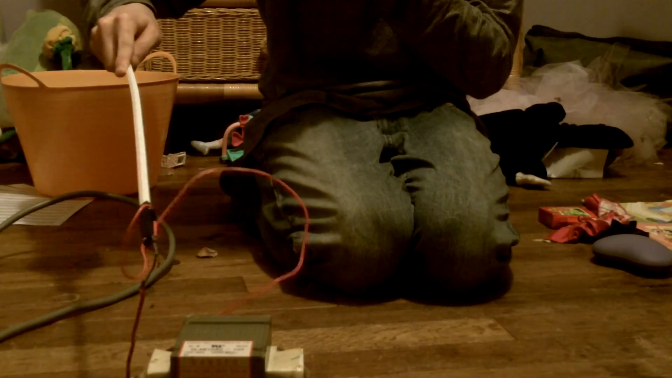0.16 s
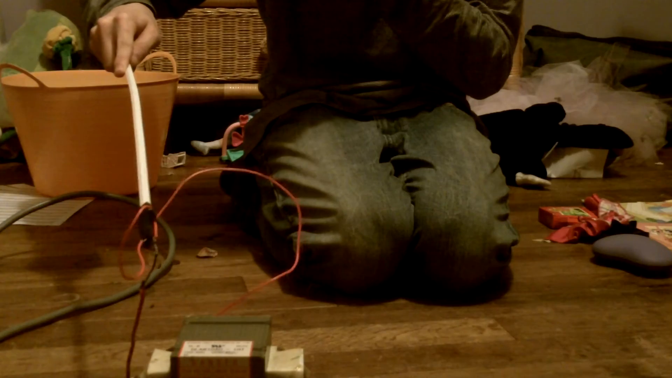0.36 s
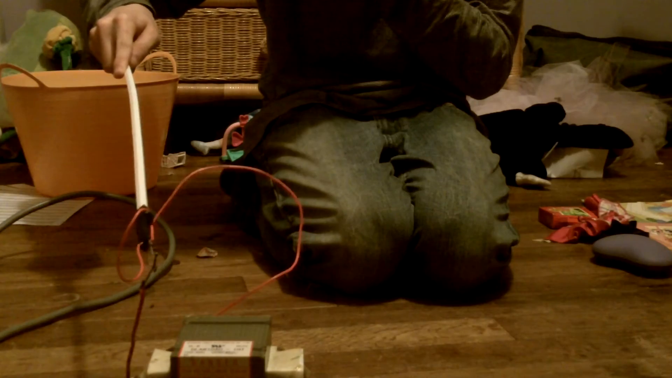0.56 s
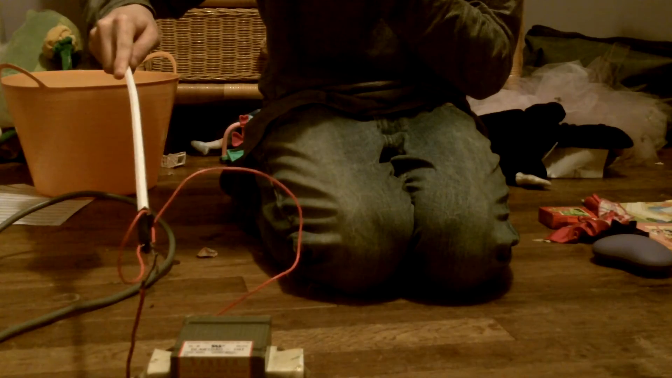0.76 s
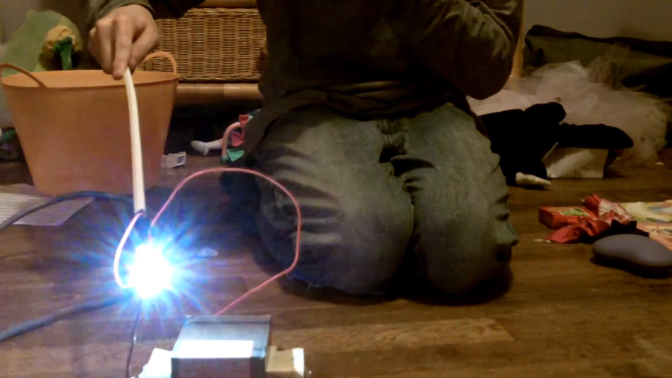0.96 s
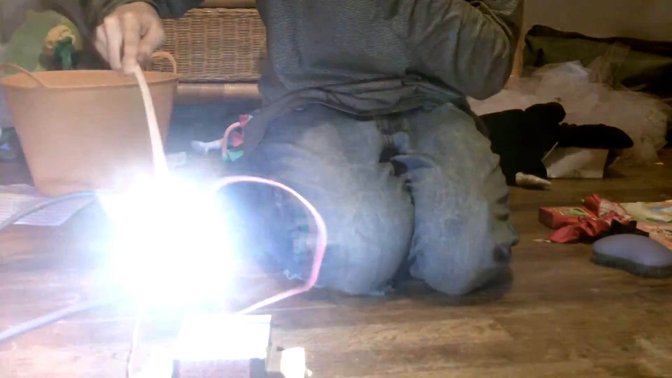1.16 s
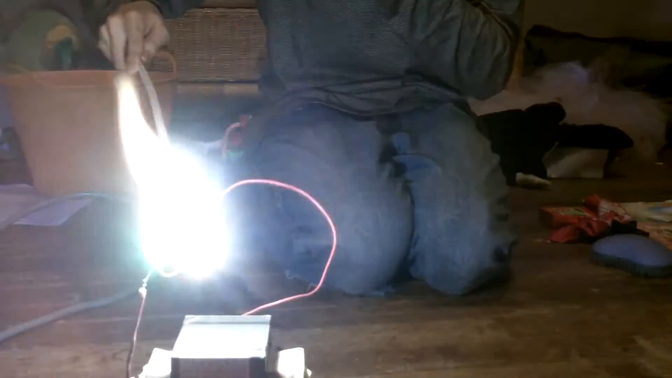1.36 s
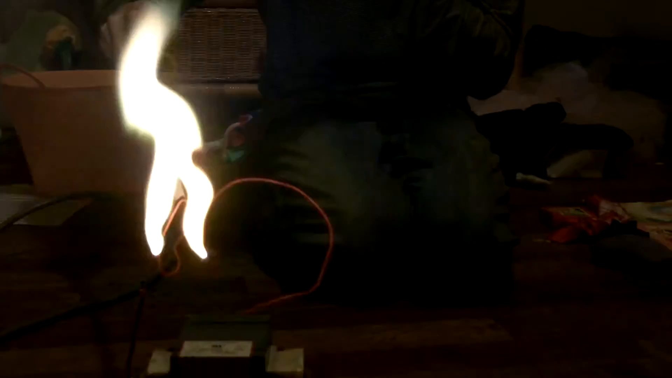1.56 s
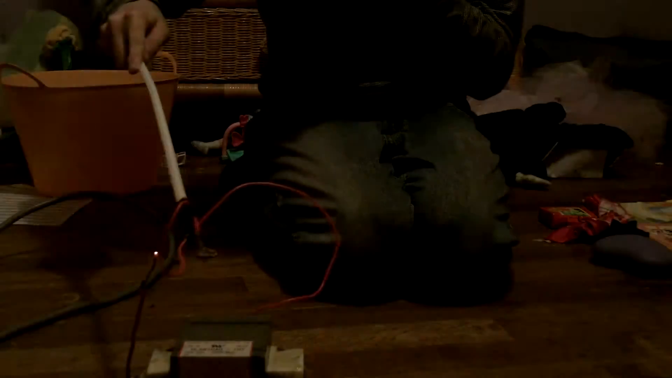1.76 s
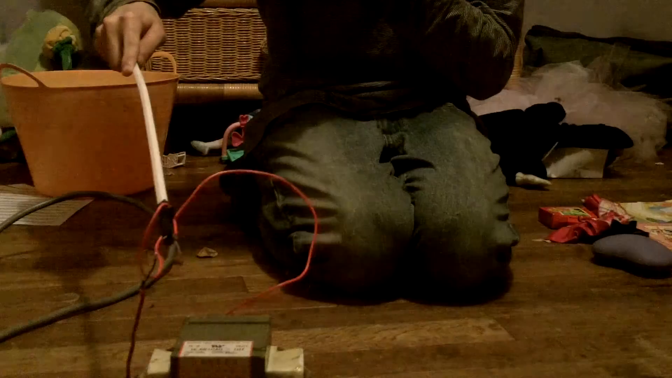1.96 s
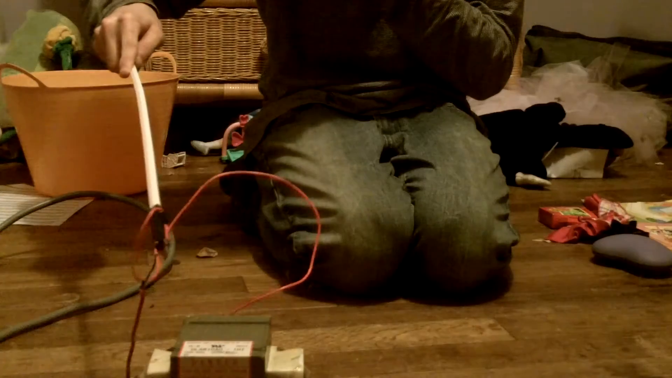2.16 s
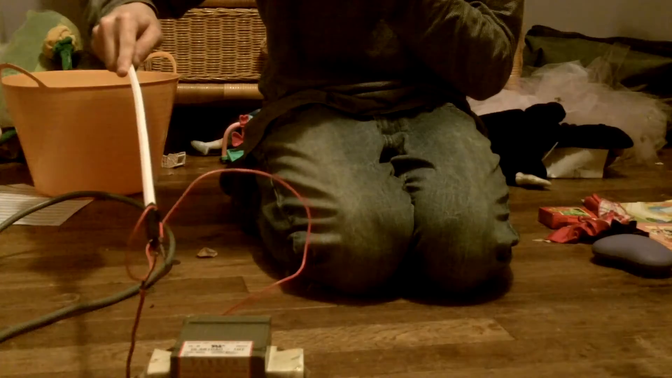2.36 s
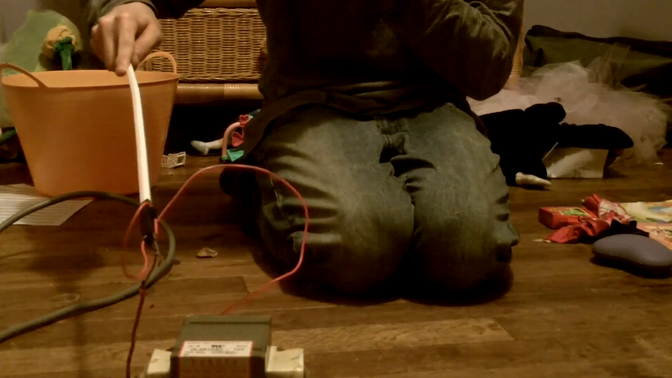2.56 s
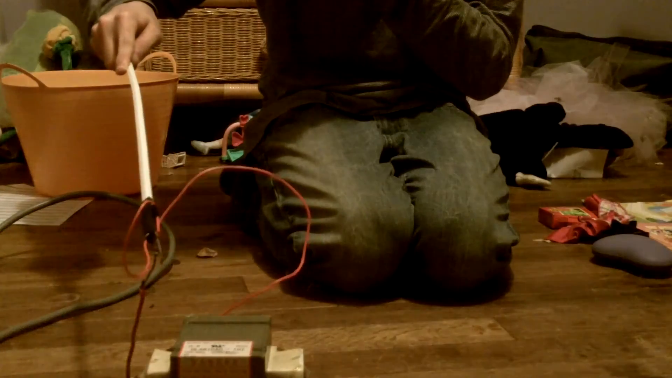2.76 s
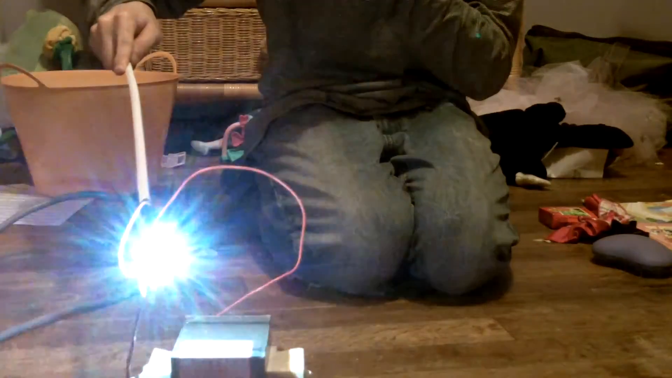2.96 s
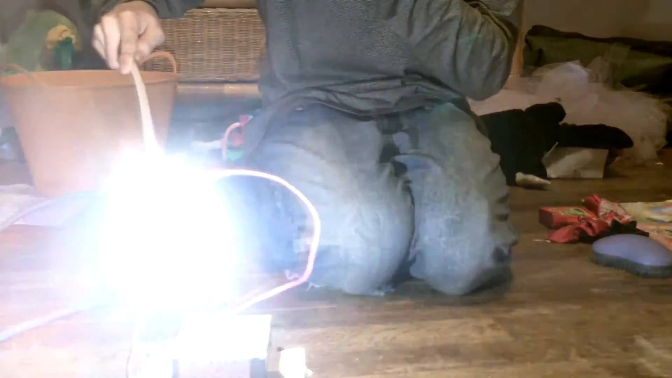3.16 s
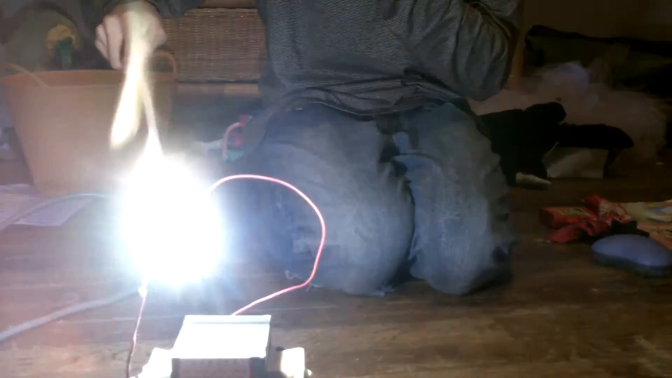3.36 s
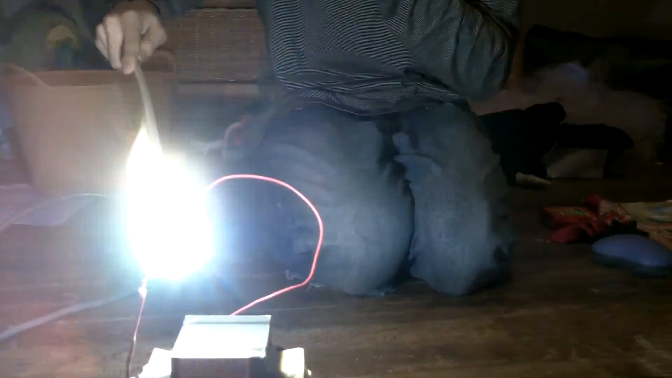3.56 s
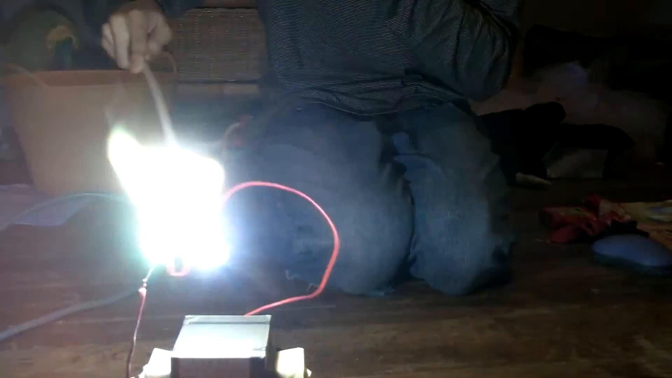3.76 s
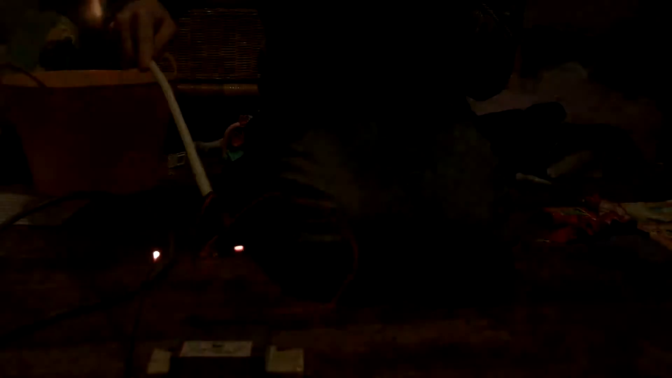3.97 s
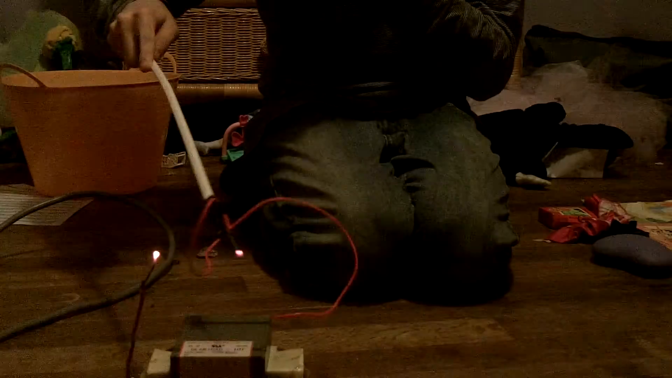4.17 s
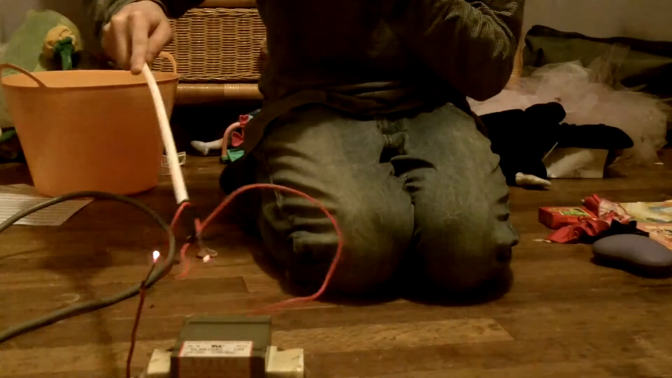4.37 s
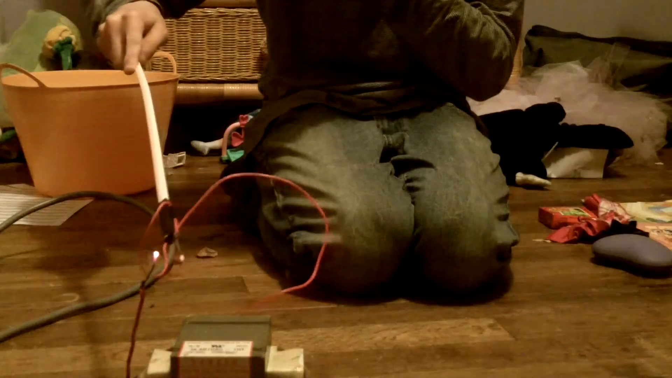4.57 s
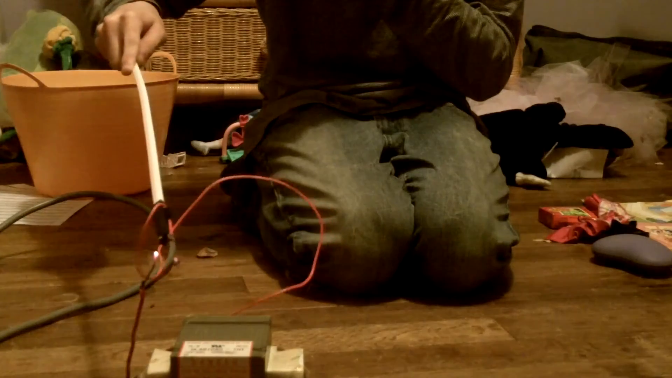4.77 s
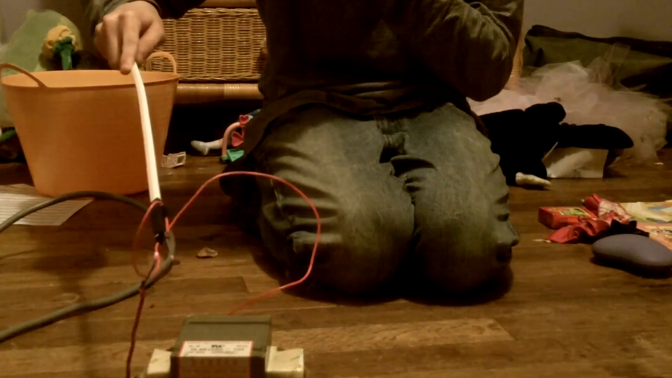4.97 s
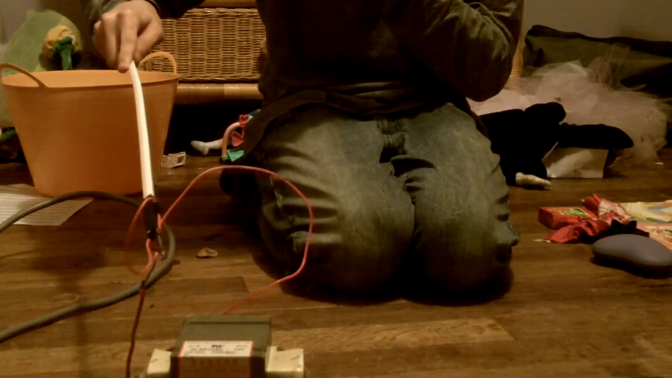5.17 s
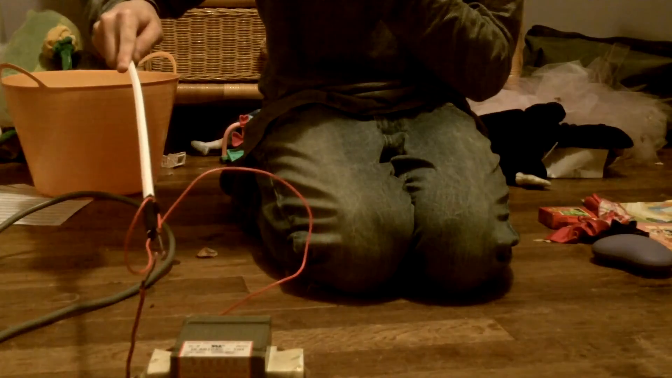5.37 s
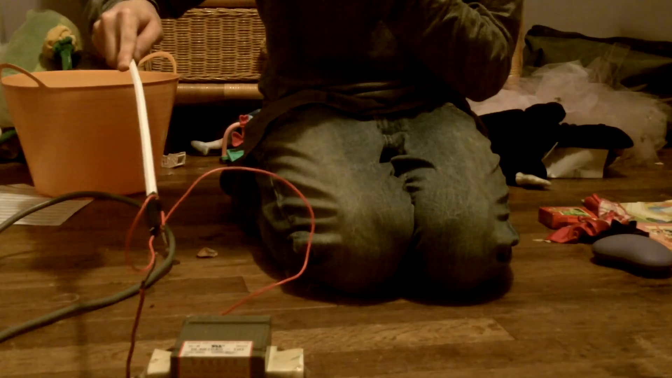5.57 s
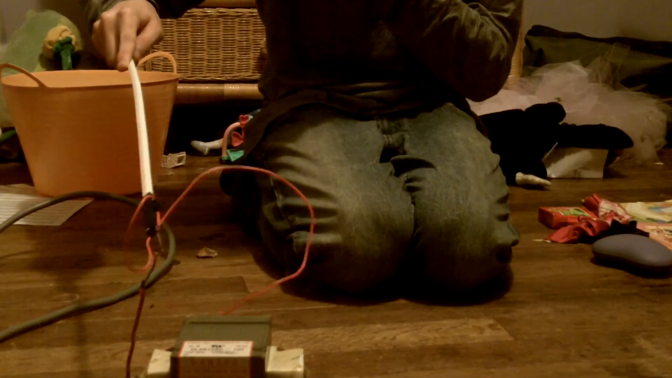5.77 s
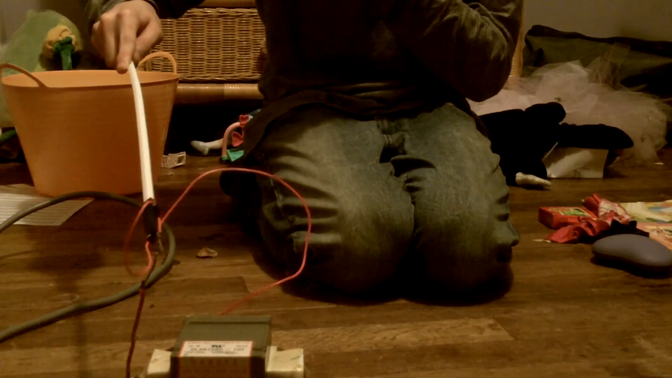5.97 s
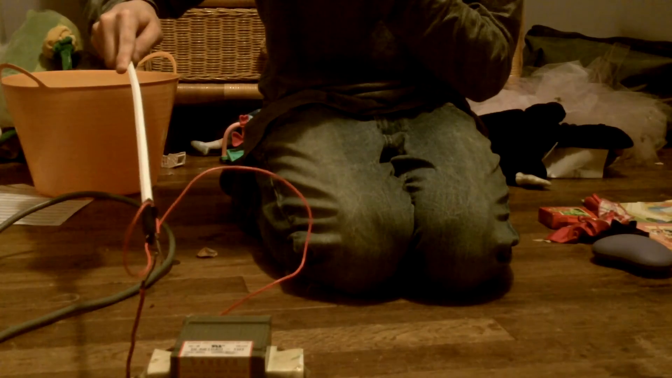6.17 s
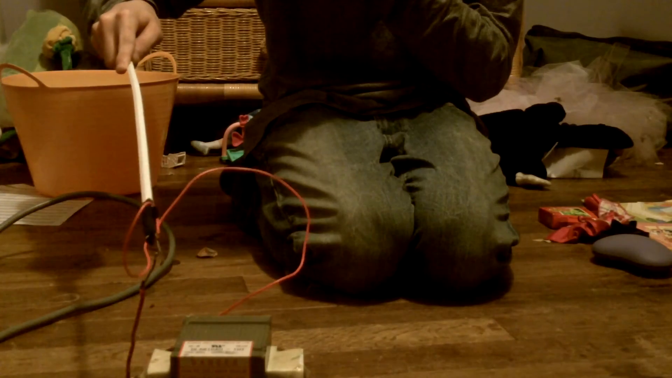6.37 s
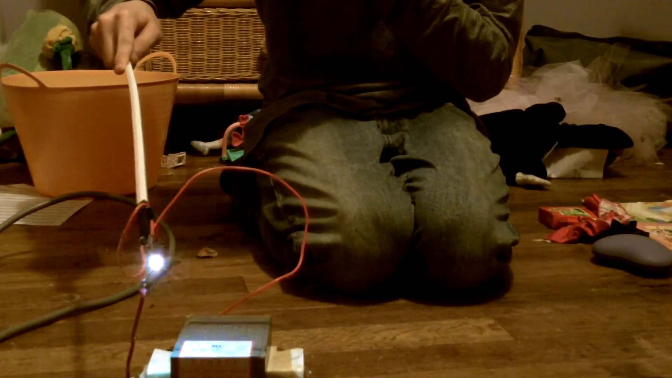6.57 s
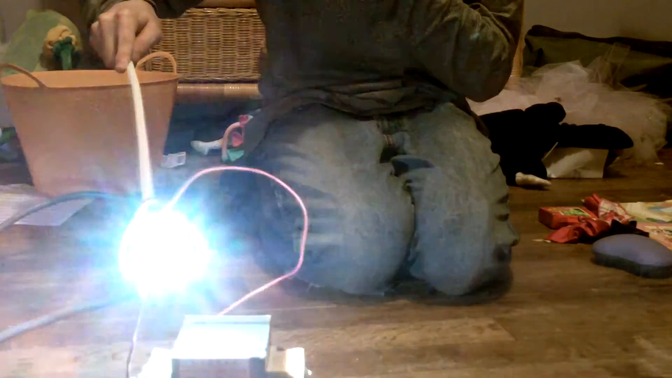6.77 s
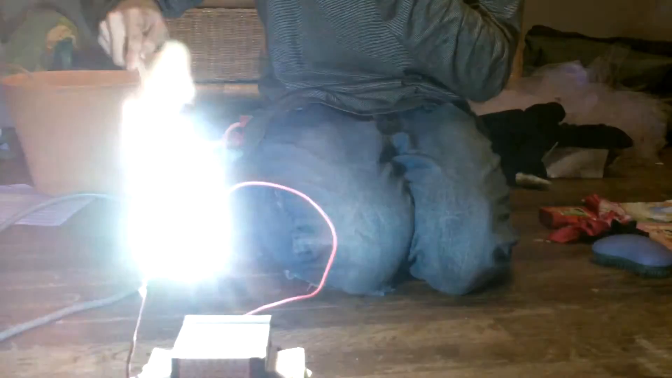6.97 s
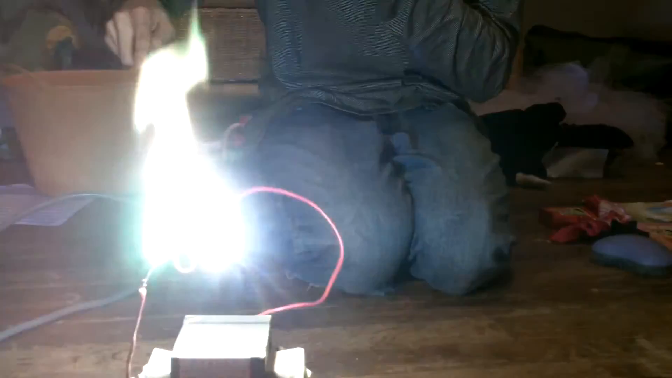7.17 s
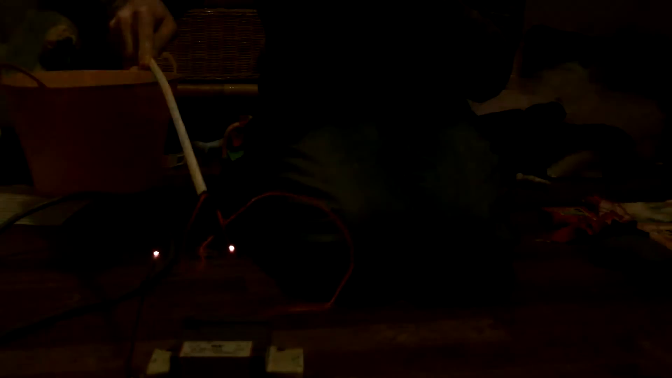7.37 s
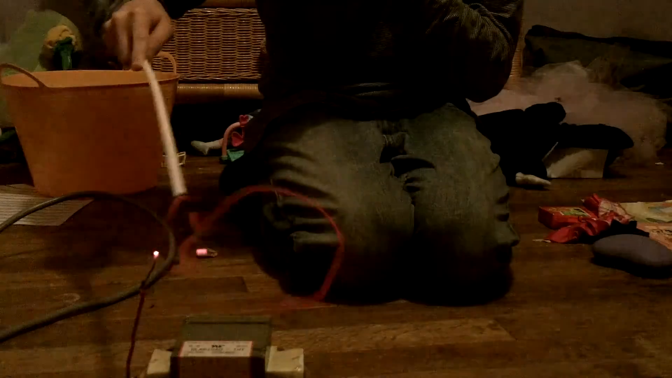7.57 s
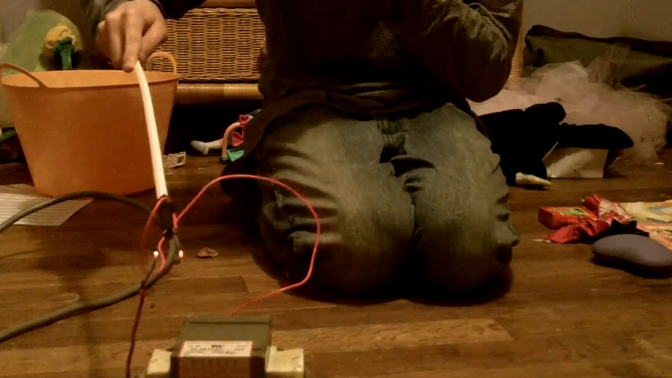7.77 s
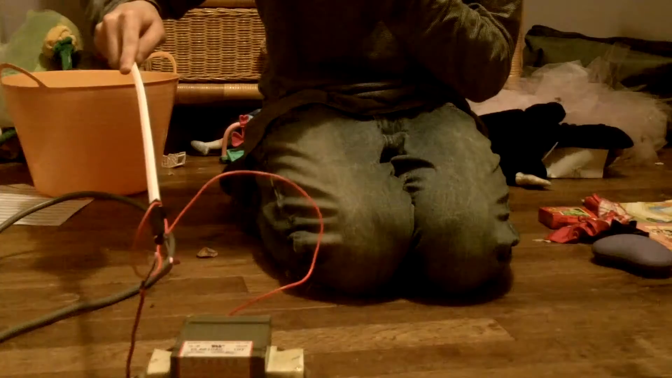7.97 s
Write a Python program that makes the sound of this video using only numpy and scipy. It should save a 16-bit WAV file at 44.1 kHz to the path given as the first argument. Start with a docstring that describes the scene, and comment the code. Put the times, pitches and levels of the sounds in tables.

```python
"""A small room with a wooden floor, where a mains transformer hums and electronics whine faintly.
The transformer strikes three arcs, each drawn out until it blows off with a soft puff.
An arc starts as a thin sizzle at the contact while the loaded core rattles. The growing flame then
throbs with every half cycle of the current, fizzes at the electrodes, crackles and snaps as it restrikes."""
import sys
import numpy as np
from scipy import signal
from scipy.fft import rfft, irfft
from scipy.io import wavfile
from scipy.ndimage import uniform_filter1d

SR = 44100
rng = np.random.default_rng(int(sys.argv[2]) if len(sys.argv) > 2 else 0)


def master(y):
    """Save y as 16-bit WAV."""
    cut = np.clip(np.atleast_2d(y).T, -1, 1)
    pcm = np.round(cut * 32767)  # scale
    wavfile.write(sys.argv[1], SR, pcm.astype(np.int16))


N = 353417
T = np.arange(N) / SR
MAINS_HZ = 60
CURRENT_ZERO = .6  # the current dies this far through each half cycle


def undb(db):
    """Decibels to gain."""
    return 10 ** (np.asarray(db) / 20)


def unit(x):
    """Scale to rms 1."""
    return x / np.sqrt(np.mean(x ** 2))


def band(x, lo_hz, hi_hz):
    """Band-pass."""
    edges_hz = [lo_hz, min(hi_hz, .48 * SR)]
    return signal.sosfilt(signal.butter(3, edges_hz, "band", fs=SR, output="sos"), x)


def ring(x, response):
    """Pass x through an impulse response."""
    return signal.fftconvolve(x, response)[:N]


def colour(x, eq, size=4096):
    """Minimum-phase EQ through points of freq_hz, gain_db."""
    hz, db = np.transpose(eq)
    bins_hz = np.arange(size // 2 + 1) * SR / size
    log_gain = np.log(undb(np.interp(np.log(bins_hz + 1), np.log(hz), db)))
    cepstrum = irfft(log_gain)
    cepstrum[1:size // 2] *= 2
    cepstrum[size // 2 + 1:] = 0
    return ring(x, irfft(np.exp(rfft(cepstrum))))


def drift(rate_hz):
    """Random modulation that glides to a new value rate_hz times a second."""
    return np.interp(T * rate_hz, np.arange(N), rng.standard_normal(N))


def delay(x, s):
    """The same sound s seconds later."""
    return np.interp(T - s, T, x, left=0)


def clicks(times_s, sizes):
    """Single impulses."""
    out = np.zeros(N)
    np.add.at(out, np.clip(np.round(times_s * SR).astype(int), 0, N - 1), sizes)
    return out


def sine(pitch_hz, rms_db, phase_cycles=0):
    """A pure tone."""
    return np.sqrt(2) * undb(rms_db) * np.sin(2 * np.pi * (pitch_hz * T + phase_cycles))


def gate(on_s, off_s, release_s=.004):
    """Instant attack, hold, quick release."""
    return (T >= on_s) * np.exp(-np.maximum(T - off_s, 0) / release_s)


# EQ of the room's noise bed: freq_hz, gain_db
ROOM_TONE_EQ = [(12, -8), (24, 1), (42, -1), (65, 0.5), (100, -5.5), (250, -10.5), (550, -14.5),
                (1200, -19.5), (3000, -22), (5200, -33), (7000, -35.5), (8200, -41.5), (10500, -34.5),
                (15500, -35)]

def room_tone(level_db=-63.5):
    """Low room rumble with microphone hiss."""
    return undb(level_db) * unit(colour(rng.standard_normal(N), ROOM_TONE_EQ, size=16384))


def electronics_whine(pitch_hz=4724, tone_db=-77, hiss_db=-79):
    """Electronics hold one thin tone in a narrow band of hiss."""
    return sine(pitch_hz, tone_db) + undb(hiss_db) * unit(band(rng.standard_normal(N), 4510, 4900))


# idle hum of the core: mains_harmonic, level_db
IDLE_PARTIALS = [(2, -76), (4, -67.5), (6, -71.5), (8, -76.5), (10, -83.5), (14, -85)]
# extra hum under load: mains_harmonic, level_db
LOAD_PARTIALS = [(2, -60), (3, -66)]

def core_hum(load, wobble_db=.7):
    """The laminations hum all the time, with more low end under load."""
    idle = sum(sine(k * MAINS_HZ, db + wobble_db * drift(5.6), rng.random()) for k, db in IDLE_PARTIALS)
    return idle + load * sum(sine(k * MAINS_HZ, db) for k, db in LOAD_PARTIALS)


# cue sheet, one row an arc; each layer and the mix trim these levels further:
# strike_s, contact_opens_s, blow_off_s, sizzle_db, sizzle_start_offset_db, crackle_db, fizz_db
ARC_CUES = [(0.886, 1.11, 1.603, -48, -9, -44.5, -64), (2.886, 3.11, 3.881, -44.5, -10, -44.5, -63.5),
            (6.636, 6.86, 7.296, -46, -2, -46, -64.5)]
# buzz fader as the flame grows and sways, one curve an arc: time_s, level_db
BUZZ_CURVES = [
    [(1.05, -61), (1.07, -60), (1.138, -44), (1.262, -33), (1.342, -36), (1.444, -30), (1.6, -31)],
    [(3.07, -59), (3.156, -41), (3.246, -30), (3.312, -34), (3.356, -32), (3.468, -32), (3.568, -37),
     (3.632, -33), (3.764, -34), (3.84, -29), (3.87, -29)],
    [(6.79, -58), (6.814, -58), (6.914, -37), (7.014, -32), (7.196, -31), (7.29, -33)],
]
# electrode spurts that lift the contact sizzle or the open arc's fizz: start_s, length_s, boost_db
ELECTRODE_SPURTS = [(.935, .055, 10), (1.05, .035, 7), (1.47, .135, 6), (3.328, .11, 11), (3.615, .022, 9),
                    (3.735, .02, 9), (6.785, .06, 4), (7.245, .03, 9)]

def arc_envelopes(seed_db=-86, crackle_knee_db=-48, flash_sizzle_db=-50, flash_fizz_db=-56):
    """Each arc strikes, opens, grows and breaks: envelopes for buzz, crackle, sizzle, fizz, load, stretch."""
    spurt = undb(sum(db * gate(s, s + length_s, release_s=.008) for s, length_s, db in ELECTRODE_SPURTS))
    total = 0
    for cue, curve in zip(ARC_CUES, BUZZ_CURVES):
        strike_s, opens_s, end_s, sizzle_db, offset_db, crackle_db, fizz_db = cue
        lit = gate(strike_s, end_s)
        age_s = np.maximum(T - strike_s, 0)
        buzz = undb(np.interp(T, *np.transpose([(strike_s, seed_db), *curve])))
        crackling = undb(crackle_db) * buzz / (buzz + undb(crackle_knee_db))  # levels off past the knee
        flash = np.exp(-age_s / .005)  # sparks at first touch
        build_up = undb(sizzle_db + offset_db * np.exp(-age_s / .07))
        touching = gate(strike_s, opens_s, release_s=.012)
        sizzle = touching * (spurt * build_up + undb(flash_sizzle_db) * flash)
        fizz = np.where(T > opens_s, spurt, 1) * undb(fizz_db) + undb(flash_fizz_db) * flash
        load = lit * (1 - np.exp(-age_s / .025))
        stretch = (T < end_s + .05) * np.exp(np.minimum(T - end_s, 0) / .042)  # peaks as the arc breaks
        total = total + np.array([lit * buzz, lit * crackling, sizzle, lit * fizz, load, stretch])
    return total


def spits(eq, decay_share, floor_db, scatter_db):
    """Sparks spit once every half cycle and die away within a share of it."""
    half_cycles = 2 * MAINS_HZ * T - CURRENT_ZERO + .04
    sizes = undb(scatter_db * np.clip(rng.standard_normal(N), -1.6, 1.6))
    bursts = sizes[np.floor(half_cycles).astype(int)] * np.exp(-(half_cycles % 1) / decay_share)
    return unit(colour(rng.standard_normal(N) * (bursts + undb(floor_db)), eq))


# thin, biting EQ of the contact: freq_hz, gain_db
SIZZLE_EQ = [(100, -11), (1200, -12.5), (1800, -1.5), (2150, 4), (2600, 2), (3700, 1), (4600, 1.5),
             (5300, -7), (6200, -7), (7900, -27), (10500, -26), (12000, -25), (15500, -29)]

def contact_sizzle(envelope, tick_db=-9, spit_db=-1):
    """The contact ticks evenly and sizzles while the gap is tiny."""
    zeros_s = np.arange(CURRENT_ZERO, 2 * MAINS_HZ * N / SR) / (2 * MAINS_HZ)
    ticks = unit(colour(clicks(zeros_s, 1.), SIZZLE_EQ))
    sparks = spits(SIZZLE_EQ, decay_share=.065, floor_db=-23, scatter_db=3)
    return envelope * (undb(tick_db) * ticks + undb(spit_db) * sparks)


# airy EQ of the electrode tips: freq_hz, gain_db
FIZZ_EQ = [(1500, -38), (5500, -3.5), (8000, -4), (10000, 2.5), (11700, 8.5), (12800, -3), (13800, 2.5),
           (15500, -19.5)]

def electrode_fizz(envelope, trim_db=-2):
    """The hot electrode tips fizz as long as the arc burns."""
    return undb(trim_db) * envelope * spits(FIZZ_EQ, decay_share=.085, floor_db=-28, scatter_db=6)


# metallic resonances of the core: pitch_hz, width_hz, relative_db
RATTLE_MODES = [(585, 17, -4), (1135, 35, -6), (1448, 38, -5), (1800, 55, 1), (2395, 55, 1), (2760, 70, 0),
                (3330, 50, -24.5), (3730, 52, -1)]

def core_rattle(load, trim_db=-54, scatter_db=1.8):
    """Under load the laminations knock twice a cycle and ring."""
    knock_s = np.arange(0, N / SR, 1 / (2 * MAINS_HZ))
    knocks = clicks(knock_s, undb(scatter_db * rng.standard_normal(len(knock_s))))
    t = T[:SR // 8]
    body = sum(undb(db) * width_hz * np.exp(-np.pi * width_hz * t) * np.sin(2 * np.pi * pitch_hz * t)
               for pitch_hz, width_hz, db in RATTLE_MODES)
    return load * undb(trim_db) * unit(ring(knocks, body))


# pressure cycle of the flame: mains_harmonic, relative_db
BUZZ_PARTIALS = [(1, -20), (2, 8), (3, -5), (4, 4.5), (5, -14), (6, 5.2), (7, -2.5), (8, 1.5), (9, -13.5),
                 (10, -5.5), (12, -13), (13, -17), (14, -15.5), (15, -24)]

def flame_buzz(envelope, stretch, jitter_cycles=.0054, lead_cycles=.05, sharpen=.32,
               rough_db=1.1, flutter_db=-11, trim_db=-.6):
    """The hot air shrinks at every current zero: a dip of pressure, sharper while the flame is small."""
    size = np.clip(envelope / undb(-31), .15, 1)
    jitter = jitter_cycles * size * (drift(120) + drift(10)) / 2
    # a long arc has more resistance, so the current lags less and its zeros come earlier
    phase = MAINS_HZ * T - CURRENT_ZERO / 2 + lead_cycles * stretch + jitter
    throb = 0
    for k, db in BUZZ_PARTIALS:
        # odd harmonics: the two polarities go out at slightly different moments
        wave = size * np.sin(2 * np.pi * k * phase) if k % 2 else -np.cos(2 * np.pi * k * phase)
        tilt = size ** (-sharpen * np.log(min(k, 10) / 4))
        throb = throb + undb(db) * tilt * wave
    throb /= np.sqrt(uniform_filter1d(throb ** 2, size=2205))  # even out the level over 50 ms
    flutter = size ** 2 * unit(band(rng.standard_normal(N), 125, 620))  # only a tall flame flutters
    roughness = undb(rough_db * drift(120))
    return undb(trim_db) * envelope * (throb * roughness + undb(flutter_db) * flutter)


# mid-heavy EQ of the crackle: freq_hz, gain_db
CRACKLE_EQ = [(35, -25.5), (160, -1), (550, 1.5), (690, -6), (870, 0.5), (1130, -2.5), (1420, 1.5),
              (1600, -1.5), (1820, 0), (2080, -4.5), (3650, -5.5), (4800, -12), (6000, -18), (7900, -39.5),
              (15000, -36.5)]

def crackle(envelope, tick_scatter_db=2, restrike_db=-1, restrike_scatter_db=3, weak_side_db=-7,
            lag_s=.0018, lag_spread_s=.0004, fry_db=-11.5, trim_db=-1.5):
    """An even tick as the current dies, then an uneven restrike, stronger on one polarity, over frying."""
    half_cycle = np.arange(int(2 * MAINS_HZ * N / SR))
    tick_shift, tick_size, strike_shift, strike_size = rng.standard_normal((len(half_cycle), 4)).T
    zeros_s = (half_cycle + CURRENT_ZERO) / (2 * MAINS_HZ)
    unrest = np.clip(np.interp(zeros_s, T, envelope) / undb(-47.5), .1, 1)  # a short arc burns evenly
    ticks = clicks(zeros_s + .00018 * unrest * tick_shift, -undb(tick_scatter_db * tick_size))
    strike_db = restrike_db + weak_side_db * (half_cycle % 2) + restrike_scatter_db * strike_size
    strikes = clicks(zeros_s + lag_s + lag_spread_s * strike_shift, unrest * undb(strike_db))
    fry = rng.standard_normal(N) * undb(1.7 * drift(700))
    sound = colour(unit(ticks + strikes) + undb(fry_db) * unit(fry), CRACKLE_EQ)
    midrange_rms = np.std(band(sound, 740, 1330))
    return envelope * undb(trim_db) * sound / midrange_rms


# volleys of loud restrikes in step with the mains:
# start_s, snap_count, spacing_half_cycles, relative_db, brightness_steps
SNAP_VOLLEYS = [(1.1490, 1, 1, -18, 5), (1.2235, 1, 1, -10, -2), (1.2569, 1, 1, -10.5, 8),
                (1.2895, 1, 1, -11, -6), (1.4050, 1, 1, -25, 9), (1.4322, 2, 3, -17, -4),
                (1.4402, 2, 4, -12.5, 1), (3.0978, 4, 2, -22, 5), (3.2072, 4, 1, -13, -6),
                (3.2485, 2, 1, -10.5, -2), (3.3312, 1, 1, -17, 2), (3.3725, 1, 1, -14, 3),
                (3.4072, 5, 1, -12.5, -1), (3.4820, 3, 1, -14.5, -4), (3.5314, 3, 4, -17, 1),
                (3.6482, 3, 2, -14, -5), (3.6308, 2, 8, -19, 8), (3.7470, 1, 1, -19, 8),
                (6.8472, 1, 1, -21, 3), (7.0153, 1, 1, -18, -10), (7.1328, 2, 4, -17, -8)]
# hard EQ of one snap: freq_hz, gain_db
SNAP_EQ = [(35, -28), (160, -6), (550, -2), (700, -6), (880, 1), (1130, -1), (1400, 3), (1600, 0),
           (1850, 2), (2100, -2.5), (2600, -1.5), (3650, -4.5), (4800, -11), (6000, -17), (7900, -37),
           (15000, -35)]

def restrike_snaps(fade_db=-.3, jitter_s=.00015, scatter=1.2, crossover_hz=2700, bright_step_db=.76,
                   fray=.09, fray_s=.0005, trim_db=1.2):
    """Breakdowns across the long gap: one shock each, bright or dull, frayed by the crooked channel."""
    hits = np.array([(start_s + k * spacing / (2 * MAINS_HZ), db + k * fade_db, brightness)
                     for start_s, count, spacing, db, brightness in SNAP_VOLLEYS
                     for k in range(round(count))])
    hits += rng.standard_normal(hits.shape) * [jitter_s, scatter, scatter]
    times_s, hit_db, brightness = hits.T
    lowpass = signal.butter(2, crossover_hz, fs=SR)
    body = signal.lfilter(*lowpass, clicks(times_s, undb(hit_db)))
    edge = clicks(times_s, undb(hit_db + bright_step_db * brightness))
    edge += fray * rng.standard_normal(N) * ring(edge, np.exp(-T[:SR // 100] / fray_s))
    edge -= signal.lfilter(*lowpass, edge)
    shock_peak = np.abs(colour(clicks(np.zeros(1), 1.), SNAP_EQ)).max()
    return undb(trim_db) * colour(body + edge, SNAP_EQ) / shock_peak


def blow_off(level_db=-36, fade_s=.012):
    """The flame tears away with a soft low puff."""
    swell = sum(np.exp(-np.abs(T - end_s) / fade_s) for _, _, end_s, *_ in ARC_CUES)
    return undb(level_db) * swell * unit(band(rng.standard_normal(N), 130, 195))


# first bounces: delay_s, gain
REFLECTION_TAPS = [(.00058, 0.25), (.0012, 0.16), (.0033, .3), (.006, 0.11)]

def early_reflections(x):
    """The floor and nearby things throw the sound straight back."""
    return sum(gain * delay(x, delay_s) for delay_s, gain in REFLECTION_TAPS)


def room_tail(x, low_t60_s=.28, mid_t60_s=.25, high_t60_s=.27, attack_s=.004):
    """Short, diffuse ringing of a small furnished room."""
    t = T[:SR // 2]
    noise = rng.standard_normal(len(t))
    bands = [(36, 630, low_t60_s), (880, 5600, mid_t60_s), (5300, 22900, high_t60_s)]
    response = sum(band(noise, lo_hz, hi_hz) * undb(-60 * t / t60_s) for lo_hz, hi_hz, t60_s in bands)
    response *= 1 - np.exp(-t / attack_s)
    return ring(x, response / np.sqrt(np.sum(response ** 2)))


def scene(spark_bus_db=-3, spark_send_db=-2, buzz_send_db=-14, puff_send_db=-1.5,
          wall_s=.0037, wall_gain=.55):
    """Mono mix of arcs and transformer, with reverb sends, over the room's bed."""
    buzz_env, crackle_env, sizzle_env, fizz_env, load, stretch = arc_envelopes()
    buzz = flame_buzz(buzz_env, stretch)
    buzz += wall_gain * delay(buzz, wall_s)  # a near wall returns the buzz between two of its pulses
    puff = blow_off()
    hum = core_hum(load)
    rattle = core_rattle(load)
    sparks = crackle(crackle_env) + restrike_snaps()
    sparks += contact_sizzle(sizzle_env) + electrode_fizz(fizz_env)
    spark_bus = undb(spark_bus_db) * (sparks + rattle)
    # a steady buzz stands still in the room; only its changes from cycle to cycle ring on
    buzz_change = buzz - delay(buzz, 1 / MAINS_HZ)
    send = undb(spark_send_db) * spark_bus + undb(buzz_send_db) * buzz_change + undb(puff_send_db) * puff
    room = early_reflections(spark_bus) + room_tail(send)
    bed = room_tone() + electronics_whine() + hum
    return (bed + spark_bus + buzz + puff + room)[None]


# narrow dips of the microphone: centre_hz, width_hz
MIC_NOTCHES = [(4200, 210), (7870, 470), (8790, 650), (12600, 400)]

def record(dry, high_cut_hz=15500):
    """The small microphone has a few narrow dips and cuts the top."""
    for centre_hz, width_hz in MIC_NOTCHES:
        dry = signal.lfilter(*signal.iirnotch(centre_hz, centre_hz / width_hz, fs=SR), dry)
    return signal.sosfilt(signal.ellip(8, .2, 70, high_cut_hz, fs=SR, output="sos"), dry)


dry = scene()
out = record(dry)
master(out)
```